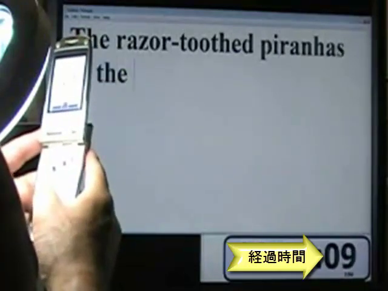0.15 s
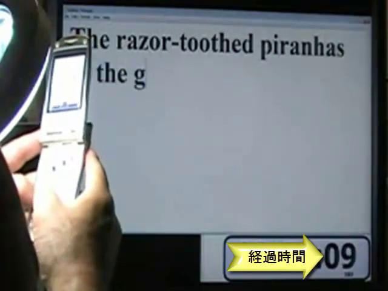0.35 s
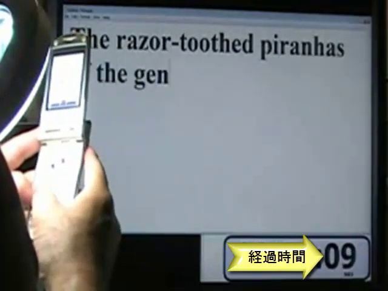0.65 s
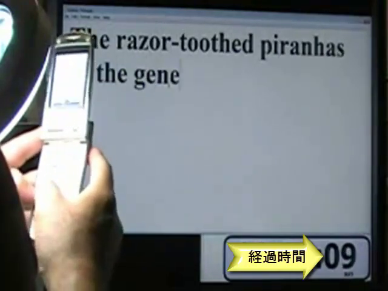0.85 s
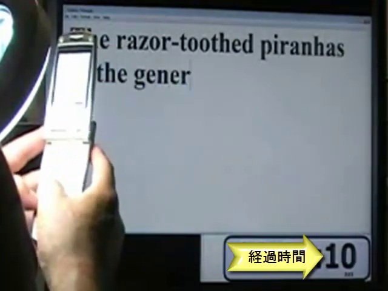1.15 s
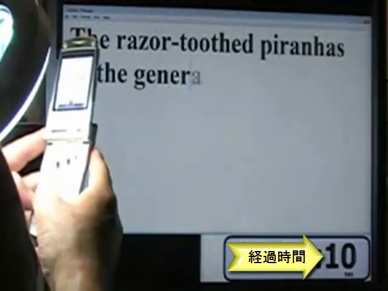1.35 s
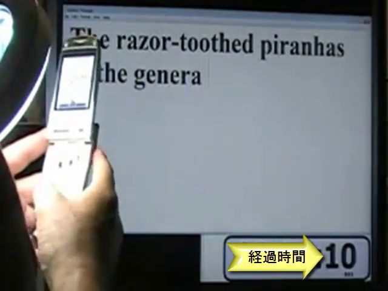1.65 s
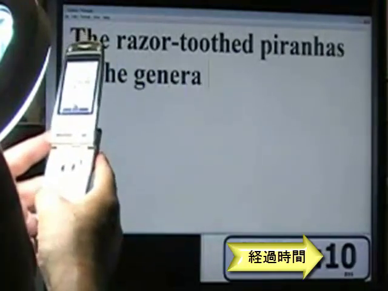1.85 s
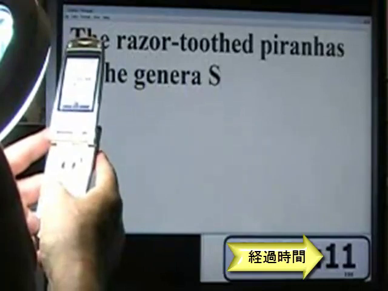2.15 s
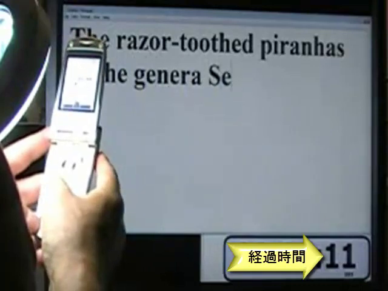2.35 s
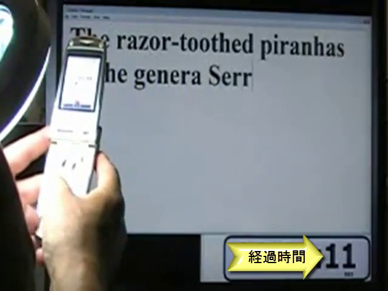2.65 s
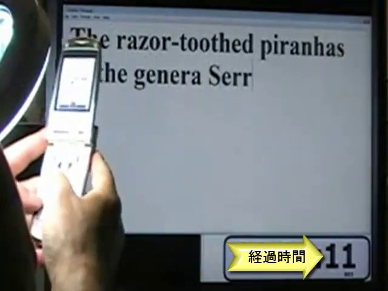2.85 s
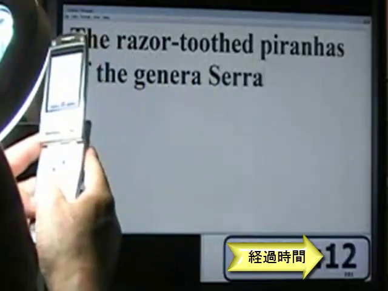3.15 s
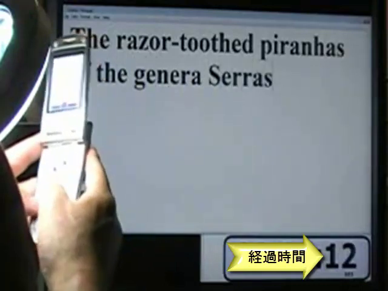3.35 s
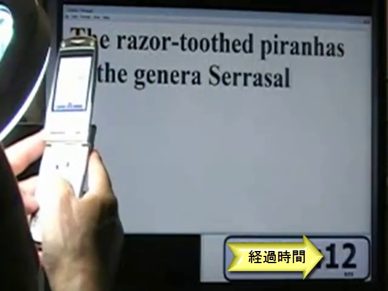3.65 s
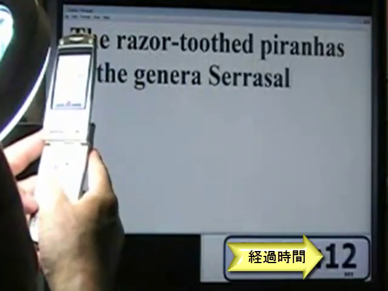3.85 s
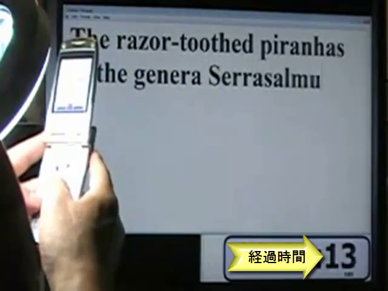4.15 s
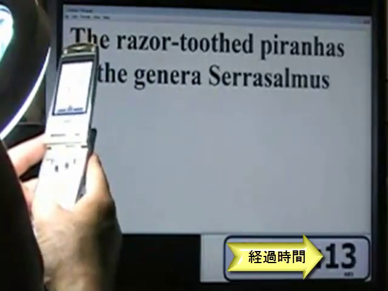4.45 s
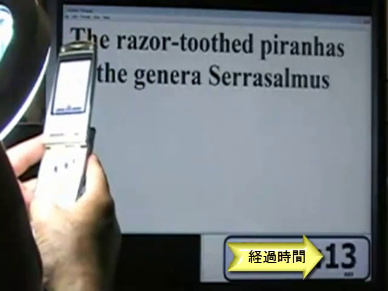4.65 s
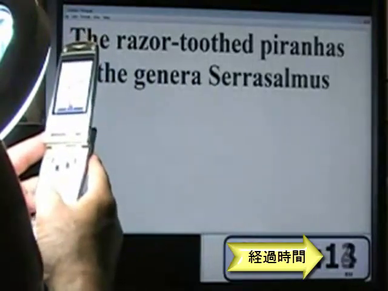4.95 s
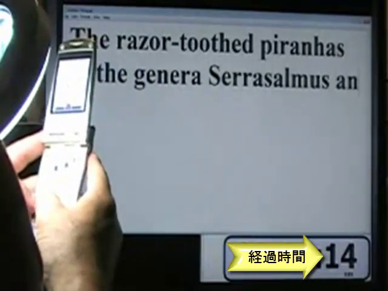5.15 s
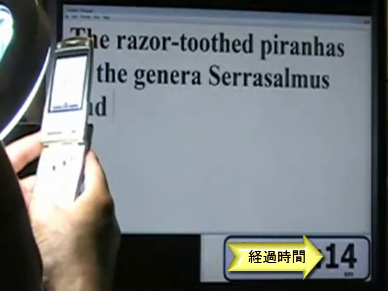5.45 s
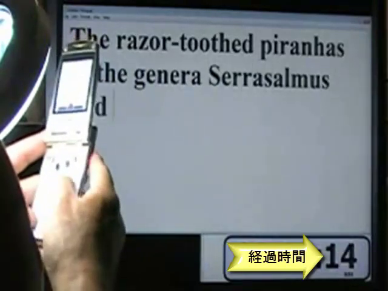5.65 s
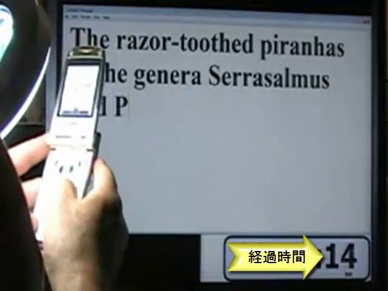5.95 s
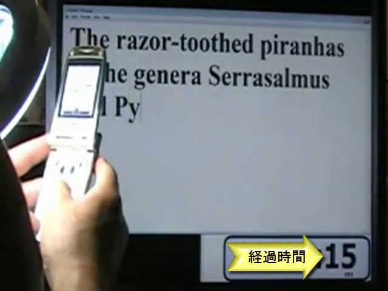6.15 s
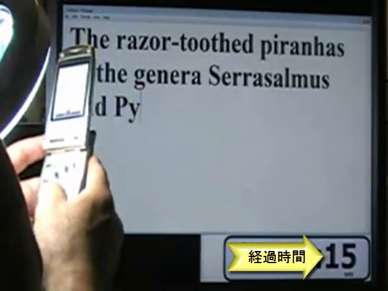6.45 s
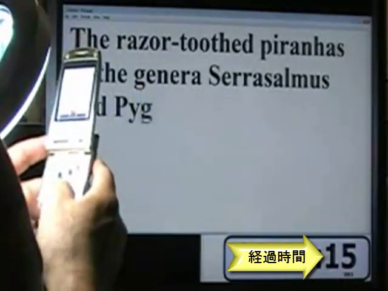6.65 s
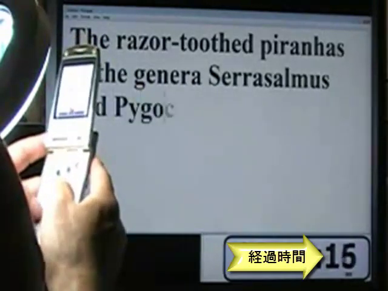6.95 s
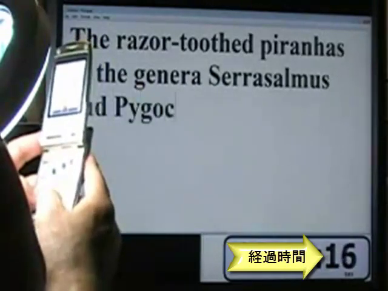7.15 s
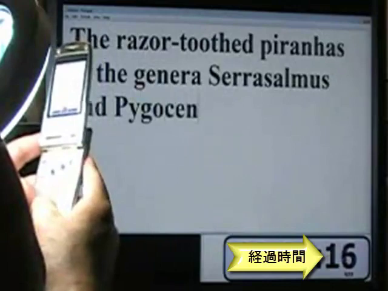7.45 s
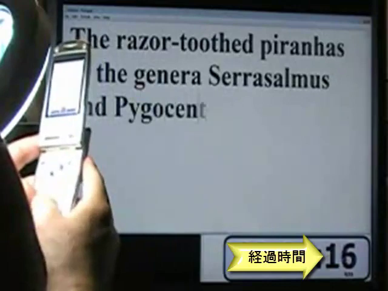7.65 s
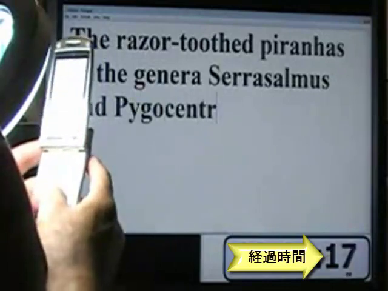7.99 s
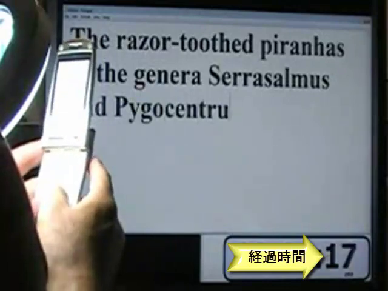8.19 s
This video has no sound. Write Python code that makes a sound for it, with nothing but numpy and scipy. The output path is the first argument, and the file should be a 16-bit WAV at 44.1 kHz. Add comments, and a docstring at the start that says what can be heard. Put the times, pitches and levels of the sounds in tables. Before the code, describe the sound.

Close to the microphone, thumbs press the small dome keys of a folding phone quickly and unevenly. Each press is a tiny crisp snap, often paired with a lighter release tick and faint plastic rattle. A small room adds short reflections. Faint electrical hum and soft air noise continue beneath; a denser clatter with a dull knock comes just after five seconds.

```python
"""Fast typing on small dome keys

Thumbs type fast on the dome keys of a folding phone held close to a camera in a small room.
Each snap is a handful of quickly dying tones with a fizz before it and a rattle after it.
Close surfaces return single echoes, and the room adds tails of decaying noise.
Sines at multiples of the mains frequency make an appliance hum, over soft shaped room noise;
a few dull knocks and soft thuds sound further off."""
import sys
import numpy as np
from scipy import signal
from scipy.io import wavfile
from scipy.ndimage import uniform_filter1d

SR = 44100
rng = np.random.default_rng(int(sys.argv[2]) if len(sys.argv) > 2 else 0)


def elevation(decibels):
    """Turn decibel levels (scalar or array-like) into linear amplitude ratios."""
    levels = np.asarray(decibels, float)
    return 10 ** (levels / 20)


def put_to_file(sound):
    """Save the sound as 16-bit audio at rate SR, in the file named by the first command-line argument."""
    columns = np.atleast_2d(sound).T  # one column per channel
    safe = np.clip(columns, -1, 1)
    whole_steps = np.round(safe * 32767)
    wavfile.write(sys.argv[1], SR, whole_steps.astype(np.int16))


N = 366912  # length in samples

# Hum of an appliance. Each row: multiple of the mains frequency, left level in dB, right level in dB,
# lead of the left side in radians.
HUM_TONES = [(1, -87, -86, .1), (2, -83, -84, 2.27), (5, -75.5, -79, 3.66), (6, -87, -99, 0.45),
             (7, -70.5, -80, 0.79), (8, -83, -69.5, 2.3), (9, -78.5, -82, 2), (10, -80.5, -73, 2.06),
             (12, -71, -80, 2.05), (14, -90, -77, 0.45), (16, -97.5, -84.5, 2), (18, -80, -63.5, 1.1),
             (19, -77, -83, 0.29)]
MAINS_HZ = 60.07

# Colour of the room noise, for the sum and the difference of the two sides.
# Each row: frequency in Hz, relative strength in dB.
NOISE_MID = [(24, -39.5), (40, -21.5), (124, -17.5), (204, -22), (413, -0.5), (892, -4.5), (1090, 2.5),
             (1230, -5.5), (1500, -5.5), (2020, -17.5), (3170, -19.5), (4260, -15), (6700, -16),
             (9000, -22), (11700, -33.5), (19800, -120)]
NOISE_SIDE = [(24, -46.5), (60, -46), (210, -22), (460, 3), (910, -4.5), (1090, -4.5), (1540, -3.5),
              (2000, -9.5), (2800, -10.5), (3500, -23), (9000, -32.5), (11700, -73)]
NOISE_MID_DB, NOISE_SIDE_DB = -61, -59  # overall levels, around which the noise swells
NOISE_SWELL_DB = 0.65  # rms of the slow wandering
NOISE_LEAN = 0.55  # share of the sum between 200 and 1500 Hz that leans to the right

# A band of hiss dips a little in pitch, then rises and fades. Each row: time in seconds,
# centre in Hz, level in dB on the scale of the noise colour.
HISS_PATH = [(0, 2720, -8.5), (3.6, 2720, -7), (6.101, 2615, -5), (6.7, 2980, -3), (7.1, 3260, -12),
             (7.5, 3350, -15.5), (8.32, 3320, -20)]
HISS_WIDTH_HZ = 267

# Soft low thuds. Each row: start in seconds, level in dB, pitch in Hz, length in seconds.
SOFT_THUDS = [(5.074, -57, 212, 0.021), (5.34, -59.5, 223, 0.02), (5.445, -62.5, 180, 0.023),
              (5.569, -59, 245, 0.012), (5.63, -68, 175, 0.045), (7.42, -62, 243, 0.018),
              (7.444, -59, 245, 0.024)]

# Dull knocks. Each row: start in seconds, level in dB, main pitch in Hz, time to fall 60 dB in seconds.
DULL_KNOCKS = [(0.674, -46.5, 624, 0.047), (0.689, -51, 570, 0.086), (.6985, -52, 674, 0.04),
               (0.713, -56, 555, 0.099), (.733, -55, 690, .04), (2.615, -48.5, 580, 0.028),
               (5.3029, -27.5, 903, 0.015), (5.3076, -29.5, 870, 0.013), (5.3126, -31, 920, 0.019),
               (5.33, -37.5, 1080, .02), (5.363, -45.5, 860, 0.02)]
# Tones inside a knock. Each row: multiple of the main pitch, level in dB.
KNOCK_TONES = [(0.548, -6.5), (0.75, -11.5), (0.998, 0.5), (1.151, 1), (1.45, -7), (2.1, 1.5), (2.6, -11),
               (3.15, -4), (3.8, -23.5)]
KNOCK_ROOM_DB = -8  # share of knocks and thuds that goes round by the room

# Presses, releases and slips of the thumbs, and the sharp crack of the heavier knock near 5.3 s. Each row:
# start in seconds, snap level in dB, brightness in dB of the high over the low dome tones, shell ring in dB,
# key cap ring in dB.
KEY_BLOWS = [(0.0307, -49, 18.5, -25, 9), (0.0954, -27, -0.5, -19, -11.5), (0.225, -37.5, 16, -7, -1),
             (0.2926, -27.5, 1.5, -20, -14), (0.306, -34, 27.5, 9.5, 1), (0.5416, -23, -6, -24, -28),
             (.5483, -33, 1, -15, -22), (.554, -35, 1, -18, -22), (.5591, -30, 4, -18, -20),
             (0.561, -28, -4, -14, -18), (.5678, -34, 2, -18, -22), (.5735, -36, 3, -18, -22),
             (.676, -71, 0, 27, 5), (0.698, -41.5, 5, 10, -1.5), (0.724, -64, 5, 22, 0),
             (0.86, -26, 7, -40, -30), (0.9892, -33.5, 11.5, -38, -4), (1.0134, -26, 14, -13, -22),
             (1.0532, -46, -9, -26, 0), (1.1375, -40, 1, -10, -22), (1.1391, -34, 1, -8, -22),
             (1.1445, -38, 4, -10, -20), (1.1517, -28, 3, -10, -10), (1.1531, -28, 3, -10, -11),
             (1.16, -36, 1, -12, -18), (1.166, -33, -2, -7, -14), (1.1678, -35, -2, -7, -14),
             (1.1764, -35, 3, -15, -17), (1.1785, -34, 3, -15, -17), (1.1888, -37, 0, -15, -20),
             (1.1936, -38, 0, -15, -20), (1.2025, -20, 6, -14, -34), (1.2202, -39, 3, -15, -20),
             (1.2252, -35, 6, -20, -22), (1.2289, -35, 6, -20, -22), (1.2335, -40, 3, -20, -20),
             (1.346, -49.5, 7, 14, 12), (1.3744, -23, 12, -16, -33), (1.4219, -50.5, 7, 3, -20),
             (1.429, -26.5, 2, -10.5, -29), (1.44, -33, 8, -3, -24), (1.451, -57.5, -6, -6, -15),
             (1.641, -24.5, -4, -36, -10.5), (1.816, -33, -7, -33, -22), (1.849, -20.5, 1, -13.5, -39),
             (1.873, -28, 5, -8, -21), (1.887, -34.5, -6, -9, -19), (2.0996, -24, 1, -23, -16),
             (2.1432, -30.5, 13, -10, -38), (2.393, -42.5, -8, -2, -24), (2.4272, -23, 7.5, -4, -18),
             (2.5583, -33.5, 0.5, -19, -40), (2.5896, -31, 1, -30, -24), (2.5906, -26, -3, -30, -22),
             (2.597, -31, -1.5, -21, -18), (2.6088, -26, 20, -29, -15), (2.6213, -34.5, -12.5, -0.5, -20),
             (2.72, -42, 3, 1, -25), (2.73, -31.5, 7.5, -22, -11), (2.7944, -35.5, 3, -33, -18),
             (2.936, -27, 7.5, -20, -37), (3.2225, -38, 4, -15, -30), (3.2265, -17.5, 5, -15, -35),
             (3.2305, -28, 3, -15, -35), (3.355, -42, 6, -23, 8), (3.378, -39.5, -2, 0.5, 0),
             (3.43, -43, 0, -12, -14), (3.44, -36.5, 0, -39, -15), (3.4618, -27.5, 15, 2.5, -7),
             (3.568, -27, -1, -21, -27), (3.6829, -22, 1.5, -27, -26), (3.7276, -38.5, 3.5, -15, -12),
             (3.787, -46.5, -4, 14.5, -24), (3.7885, -29, 13.5, -20, -6), (3.801, -48, -18, -13, -17),
             (3.808, -26, -0.5, -31, -6.5), (3.9083, -36.5, -8, -1, -21), (3.92, -47, 12, -18, 4),
             (3.966, -38.5, 5, -22, -20), (4.0078, -26, 2, -2, -15), (4.0088, -26, 2, -5, -15),
             (4.0104, -13.5, 3, -6, -20), (4.0145, -27, 4, -8, -20), (4.02, -31.5, 5, -9, -23),
             (4.2611, -27.5, 10, -2.5, -29), (4.265, -31.5, 9.5, -19, -21), (4.274, -22.5, -1.5, -11, -30),
             (4.5657, -31.5, -1, -15, -37), (4.7075, -37.5, 11.5, -32, 0), (4.9054, -25.5, 6.5, -3, -8),
             (4.9178, -36.5, 11, -27, -8), (5.0695, -24, -8, -25, -22), (5.0762, -34, -4, -20, -15),
             (5.0905, -29, -5, -15, -12), (5.0965, -37, 0, -15, -15), (5.243, -35, -1, -13, -16),
             (5.253, -24.5, 6, -6, -19), (5.2935, -42, 0, -6, 0), (5.298, -38, 0, -6, -2),
             (5.3005, -36, 2, -8, -4), (5.3032, -20, 3, -14, -2), (5.3039, -20, 3, -14, -3),
             (5.3052, -21, 0, -12, -5), (5.307, -25, 1, -10, -3), (5.3098, -26, 3, -8, 3),
             (5.313, -28, 2, -5, 0), (5.3165, -28, 2, -5, -1), (5.3195, -31, 3, -5, -1),
             (5.324, -33, 0, -4, 0), (5.33, -35, 2, -4, 0), (5.339, -37, 0, -6, 3), (5.3435, -38, 0, -8, 3),
             (5.3463, -44, -15, -9, -6), (5.395, -27, 0.5, -6, -36), (5.534, -35.5, 1, 1.5, -6),
             (5.552, -57, -6, -14, -19), (5.5545, -32, 7, -15, -16), (5.584, -31, 1.5, -27, -32),
             (5.6327, -27.5, -8.5, -26, -25), (5.6366, -59, 1, -22, -16), (5.679, -46, -17, -5, 0),
             (5.7389, -27, -1, -25, -20), (5.7404, -29, -4, -25, -20), (5.7493, -38, 0, -20, -18),
             (5.801, -34, 5, -22, -21), (5.8284, -25.5, -3.5, -7, -21), (5.946, -47, 11, -19, -20),
             (5.987, -39.5, -0.5, -13, -29), (6.1336, -17, 1, -6.5, -37), (6.247, -40.5, -7, -2, -20),
             (6.2655, -29, 19, -5, -25), (6.269, -60, -11, -21, -33), (6.2694, -32.5, 1, 4.5, -31),
             (6.4234, -41.5, 2.5, -23, -1), (6.492, -30, -5, -8, -17), (6.661, -47.5, 6, -34, -11),
             (6.667, -39.5, 9, -24, -7), (6.6824, -30, 5.5, -10.5, -17), (6.8449, -28, 6.5, -12.5, -36),
             (6.995, -42, -2.5, -33, -32), (7.0934, -36, -2, -4, -18), (7.1242, -36.5, 6, 6.5, -6),
             (7.3117, -26, 1, -11, -27), (7.315, -29.5, 13, -6.5, -17), (7.3206, -39, 20, -20, -31),
             (7.4829, -30.5, -0.5, -2, -27), (7.508, -37, 5, -21, -3), (7.5618, -32, 0, 2, -7),
             (7.681, -29.5, 11.5, -1, -41), (7.7946, -28.5, -9.5, 4.5, -34), (7.8037, -31, 9, -20, -26),
             (8.034, -30.5, -1.5, -7, -9), (8.236, -22, 1, -12, -44), (8.248, -24.5, 16, -3.5, -35),
             (8.256, -36, 14.5, -11, -30)]
# What a snap rings: the dome low and high, the key cap and the shell.
# Each row: frequency in Hz, level in dB, time to fall 60 dB in seconds.
DOME_LOW_TONES = [(4250, -2, .0028), (4800, -2, .002), (5350, -4, .0018)]
DOME_HIGH_TONES = [(6100, -2.5, .002), (6950, -.5, .002), (7650, .5, .0022), (8400, -7.5, .002)]
CAP_TONES = [(2450, -4.5, .004), (2850, -1.5, .005), (3300, -4.5, .004)]
SHELL_TONES = [(980, -20, .012), (1330, -14, .028), (1600, -13, .018), (1950, -9, .012), (2200, -13, .008)]
DOME_RISE_S, CAP_RISE_S, SHELL_RISE_S = 0.00005, 0.00081, 0.0016
FIZZ_DB, CREEP_DB = -27, -29  # quick and slow parts of the fizz before a snap, where it peaks
RATTLE_DB, RATTLE_T60_S = -21, 0.03  # loose parts chatter after every snap
ASIDE_BRIGHTNESS = 0.64  # share of the brightness left off to the side
ASIDE_DOME_DB, ASIDE_BODY_DB = -6, -8  # dome, cap and shell are weaker off to the side

# Single reflections from hand, desk and screen. Each row: delay in seconds, level in dB.
CLOSE_ECHOES = [(.0013, -10), (.0036, -16), (.0066, -15), (.0102, -21), (.0139, -23), (.0263, -20)]

# Decay of the room. Each row: frequency in Hz, time to fall 60 dB in seconds.
ROOM_DECAY = [(300, 0.36), (1300, 0.39), (3500, 0.36), (8000, 0.25)]
# Colour of the room. Each row: frequency in Hz, relative strength in dB.
ROOM_TONE = [(1000, 3), (1600, 4), (3000, 1), (4500, 1), (6000, 1), (9000, -1)]
# Width of the room. Each row: frequency in Hz, difference over sum of the two sides in dB.
ROOM_WIDTH = [(300, 6), (1200, -3), (1900, -10.5), (3100, -24), (3800, -22), (9000, -39.5)]
ROOM_DB = -1.5
ROOM_LUMPS_DB, ROOM_LUMPS_S = 4.5, 0.04  # early reflections arrive in clumps, then blend

# Levels under which patches of the sum and of the difference fall away.
# Each row: frequency in Hz, threshold in dB (for the difference: in quiet moments).
GATE_MID = [(60, -91), (200, -95), (500, -78), (900, -79), (1200, -80), (2200, -90.5), (4000, -89),
            (9000, -93.5)]
GATE_DIFFERENCE = [(30, -110), (60, -88), (200, -86), (450, -71), (1200, -78), (1700, -78), (2500, -80),
                   (3600, -88.5), (9000, -99)]
SIDE_DUCK, QUIET_DB = 0.19, -95.5  # dB of threshold per dB of treble over the quiet level


def read(points, hz):
    """Reads a table on a log-frequency axis."""
    f, value = np.transpose(points)
    return np.interp(np.log(hz + 1), np.log(f + 1), value)


def evened(x):
    """Scales to rms 1."""
    return x / np.sqrt(np.mean(x ** 2) + 1e-20)


def add(mix, s, sound):
    """Lays a sound into the mix at s seconds."""
    part = mix[round(s * SR):][:len(sound)]
    part += sound[:len(part)]


def drift(rate_hz):
    """Slow random wandering of rms 1: a sum of sines no faster than rate_hz."""
    t = np.arange(N // 64 + 1) * 64 / SR
    rates = rate_hz * np.geomspace(.05, 1, 16)
    slow = sum(np.sin(2 * np.pi * (f * t + rng.random())) / np.sqrt(f) for f in rates)
    return np.repeat(evened(slow), 64)[:N]


def ring(modes, chance, rise_s):
    """Dying sines; each blow lands elsewhere, so pitch, strength and phase scatter."""
    t = np.arange(SR // 10) / SR
    hz, db, t60 = np.transpose(modes)[:, :, None]
    pitch, strength, phase = chance[:3 * len(modes)].reshape(3, -1, 1)
    sign = (-1.) ** np.arange(len(modes))[:, None]  # neighbours have opposite sign
    size = elevation(db + 1.5 * strength - 60 * t / t60)
    waves = size * np.sin(2 * np.pi * hz * (1 + .025 * pitch) * t + .15 * phase)
    return (sign * waves).sum(0) * (1 - np.exp(-t / rise_s))


def hum():
    """Multiples of the mains frequency, each wavering in strength and phase."""
    out, t = np.zeros((2, N)), np.arange(N) / SR
    for k, left_db, right_db, lead in HUM_TONES:
        angle = 2 * np.pi * (k * MAINS_HZ * t + rng.random()) + 0.0029 * k * drift(6.0)
        size = np.sqrt(2) * elevation(1.8 * drift(8))
        sides = elevation(np.array([[left_db], [right_db]]))
        out += size * sides * np.sin([angle + lead, angle])
    return out


def air():
    """Soft room noise with drifting patches, lumpier in the upper bass, and a band of hiss."""
    frames, hz = N // 512 + 5, np.fft.rfftfreq(2048, 1 / SR)[:, None]
    real, imag, patches = rng.standard_normal((3, 2, frames, 1025)).transpose(0, 1, 3, 2)
    # blurring over frequency and time makes patches
    patches = evened(uniform_filter1d(uniform_filter1d(patches, 12, 1), 8, 2))
    patch_db = (2.6 + 1.5 * (abs(hz - 220) < 110)) * patches
    t, (s, centre_hz, db) = np.arange(frames) * 512 / SR, np.transpose(HISS_PATH)
    off_centre = (hz - np.interp(t, s, centre_hz)) / HISS_WIDTH_HZ
    hiss = elevation(np.interp(t, s, db)) * np.exp(-off_centre ** 2 / 2)
    colour = np.array([np.hypot(elevation(read(NOISE_MID, hz)), hiss), elevation(read(NOISE_SIDE, hz) + 0 * t)])
    spectrum = (real + 1j * imag) * colour * elevation(patch_db)
    mid, side = signal.istft(spectrum, nperseg=2048, noverlap=1536)[1][:, :N]
    swell_db = NOISE_SWELL_DB * drift(2.7)
    mid = elevation(NOISE_MID_DB + swell_db) * evened(mid)
    side = elevation(NOISE_SIDE_DB + swell_db) * evened(side)
    band = signal.butter(2, [200, 1500], "bandpass", fs=SR, output="sos")
    lean = NOISE_LEAN * signal.sosfilt(band, mid)
    return np.array([mid + side - lean, mid - side + lean])


def thuds():
    """Low bumps that swell and fade without an edge."""
    out = np.zeros(N)
    for s, db, hz, length in SOFT_THUDS:
        t = np.arange(0, length, 1 / SR)
        add(out, s, elevation(db) * np.sin(np.pi * t / length) ** 2 * np.sin(2 * np.pi * hz * t))
    return out


def knocks():
    """Something heavier bumps: low modes shaken by a short rough contact."""
    out, chance = np.zeros(N), rng.standard_normal((len(DULL_KNOCKS), 27 + 100))
    for (s, db, hz, t60), c in zip(DULL_KNOCKS, chance):
        # higher tones die sooner
        modes = ring([(hz * k, db + d, t60 / k ** 0.23) for k, d in KNOCK_TONES], c, 0.00051)
        contact = abs(c[27:]) * np.exp(-np.arange(100) / 3.)
        add(out, s, np.convolve(modes, contact / contact.sum()))
    return out


def slips():
    """The key reseats with one small tick at a random moment soon after each snap."""
    late, size, tone = rng.random((len(KEY_BLOWS), 3)).T
    # 4.5 to 44.5 ms later, 28 to 20 dB weaker, brightness from -8 to 8 dB
    return [(s + 0.0045 + 0.04 * w, db - 28 + 8 * u, 16 * v - 8, shell_db, cap_db)
            for (s, db, _, shell_db, cap_db), w, u, v in zip(KEY_BLOWS, late, size, tone)]


def snap(bright_db, low_chance, high_chance):
    """A dome buckles in a fraction of a millisecond and rings its low and high tones."""
    low = elevation(-bright_db / 2) * ring(DOME_LOW_TONES, low_chance, DOME_RISE_S)
    return low - elevation(bright_db / 2) * ring(DOME_HIGH_TONES, high_chance, DOME_RISE_S)


def keys():
    """Domes snap, cap and shell swing up more slowly, loose parts rattle.
    Returns the sound towards the camera and the plainer sound sent off into the room."""
    blows = KEY_BLOWS + slips()
    out, chance = np.zeros((2, N)), rng.standard_normal((len(blows), 6, 15))
    t = np.arange(-500, 1800) / SR  # seconds from the snap
    grit = rng.standard_normal((len(blows), len(t)))
    # a few contacts stand out
    ticks = grit * elevation(13.0 * np.clip(rng.standard_normal(grit.shape), -3, 2.2))
    # a fizz swells ahead of the snap
    lead_in = (elevation(FIZZ_DB + 60 * t / 0.0045) + elevation(CREEP_DB + 60 * t / 0.038)) * (t < 0)
    rattle = elevation(RATTLE_DB - 60 * t / RATTLE_T60_S) * (t > .0006) / ticks.std()
    damped = np.exp(-np.arange(600) / 12.)  # tiny contacts under the thumb ring more briefly
    for (s, db, bright_db, shell_db, cap_db), (a, b, c, d, e, f), g, tick in zip(blows, chance, grit, ticks):
        dome = snap(bright_db, a, b)
        cap = elevation(cap_db) * ring(CAP_TONES, c, CAP_RISE_S)
        body = cap + elevation(shell_db) * ring(SHELL_TONES, d, SHELL_RISE_S)
        # to the side: low tones 2 dB weaker, pitch, strength and phase a little different
        low = elevation(-ASIDE_BRIGHTNESS * bright_db / 2 - 2) * ring(DOME_LOW_TONES, a + .4 * e, DOME_RISE_S)
        high = elevation(ASIDE_BRIGHTNESS * bright_db / 2) * ring(DOME_HIGH_TONES, b + .4 * f, DOME_RISE_S)
        aside = (low - high)[:600] * damped
        aside = aside * np.linalg.norm(dome) / np.linalg.norm(aside) * elevation(ASIDE_DOME_DB)
        aside = aside + elevation(ASIDE_BODY_DB) * body[:600]
        chatter = elevation(db) * signal.fftconvolve(g * lead_in + tick * rattle, aside)
        add(out[0], s, elevation(db) * (dome + body))
        add(out[0], s + t[0], chatter)
        add(out[1], s, elevation(db) * aside)
        add(out[1], s + t[0], chatter)
    return out


def echoes(x):
    """The direct sound and single reflections from surfaces close by."""
    out = x.copy()
    for s, db in CLOSE_ECHOES:
        add(out, s, elevation(db) * x)
    return out


def room(x):
    """Three dense tails take turns, so that clicks ring out differently; widest in the low range."""
    out, turn = np.zeros((2, N)), np.arange(N) / SR * 2 * np.pi * 1.2
    for k in range(3):
        hz, t, z = signal.stft(rng.standard_normal((2, SR // 2)), SR, nperseg=128)
        z = z * elevation(read(ROOM_TONE, hz)[:, None] - 60 * t / read(ROOM_DECAY, hz)[:, None])
        z[1] *= elevation(read(ROOM_WIDTH, hz))[:, None]
        tail = signal.istft(z, SR, nperseg=128)[1]
        s = np.arange(tail.shape[1]) / SR
        tail *= 1 - np.exp(-s / 0.00072)  # soft start
        lumps = evened(uniform_filter1d(rng.standard_normal(len(s)), size=40))
        tail *= elevation(ROOM_LUMPS_DB * lumps * np.exp(-s / ROOM_LUMPS_S))
        share = np.sqrt(2 / 3) * np.cos(turn + k * 2 * np.pi / 3)
        out += signal.fftconvolve((x * share)[None], tail / np.linalg.norm(tail[0]), axes=1)[:, :N]
    return elevation(ROOM_DB) * np.array([out[0] + out[1], out[0] - out[1]])


def gate(x):
    """In the sum and the difference of the sides, patches of the spectrum under a threshold drop 40 dB.
    The threshold for the difference climbs with the treble of the sum."""
    hz, _, z = signal.stft([x[0] + x[1], x[0] - x[1]], SR, nperseg=2048, noverlap=1536)
    power = uniform_filter1d(uniform_filter1d(abs(z) ** 2, size=6, axis=1), size=3, axis=2)
    treble_db = 10 * np.log10(power[0, (hz > 4000) & (hz < 8000)].mean(0) + 1e-20)
    threshold_db = np.array([read(GATE_MID, hz), read(GATE_DIFFERENCE, hz)])[:, :, None]
    over_db = 10 * np.log10(power + 1e-20) - threshold_db
    over_db[1] -= SIDE_DUCK * (treble_db - QUIET_DB) * np.clip(hz / 3000, 0, 1)[:, None]
    gain = np.clip(.5 + over_db, .01, 1)
    mid, side = signal.istft(z * gain, SR, nperseg=2048, noverlap=1536)[1][:, :N] / 2
    return np.array([mid + side, mid - side])


def scene():
    """Keys close and central, knocks and thuds a little to the right, hum and noise all around."""
    small = signal.butter(3, 300, "highpass", fs=SR, output="sos")  # small things radiate little bass
    front, aside = keys()
    near, aside, far = signal.sosfilt(small, [echoes(front), aside, echoes(knocks())])
    far = far + thuds()
    far_sides = far * elevation(np.array([[-2.], [1.]]))  # left and right in dB
    return near + far_sides + room(aside + elevation(KNOCK_ROOM_DB) * far) + hum() + air()


def roll_off(x):
    """The treble ends steeply here."""
    return signal.sosfilt(signal.butter(12, 9260, fs=SR, output="sos"), x)


def record(dry):
    """Faint patches of the spectrum drop out and the treble falls off steeply near 9 kHz."""
    edge_hz = [0, 8650, 8950, 9250, 9500, SR / 2]
    edge = signal.firwin2(401, edge_hz, elevation(np.array([1.5, 4.0, -12.0, -20.5, -73, -90])), fs=SR)
    mix = signal.oaconvolve(gate(dry), edge[None], "same", axes=1)
    return roll_off(mix)


dry = scene()
out = record(dry)
put_to_file(out)
```